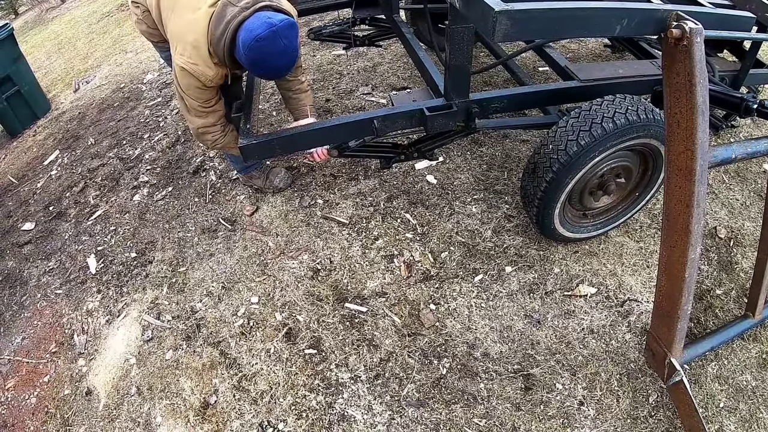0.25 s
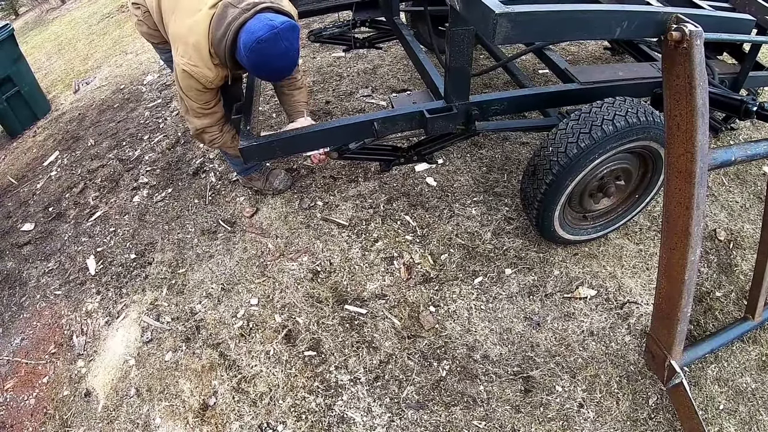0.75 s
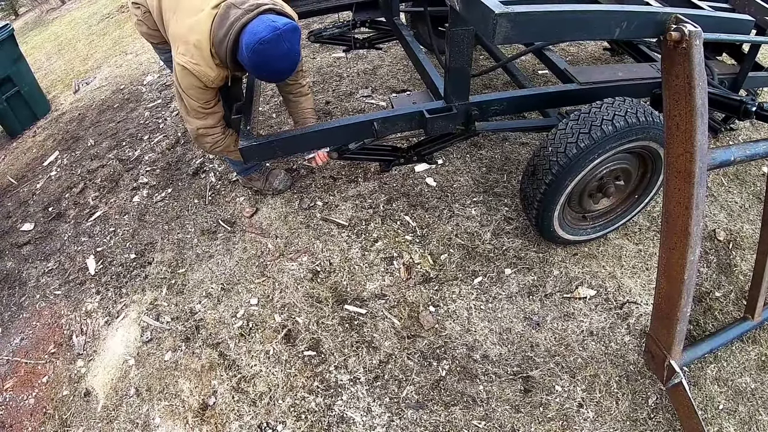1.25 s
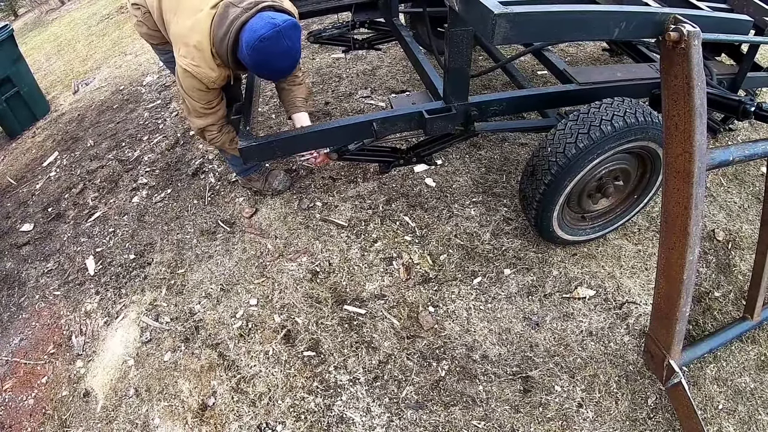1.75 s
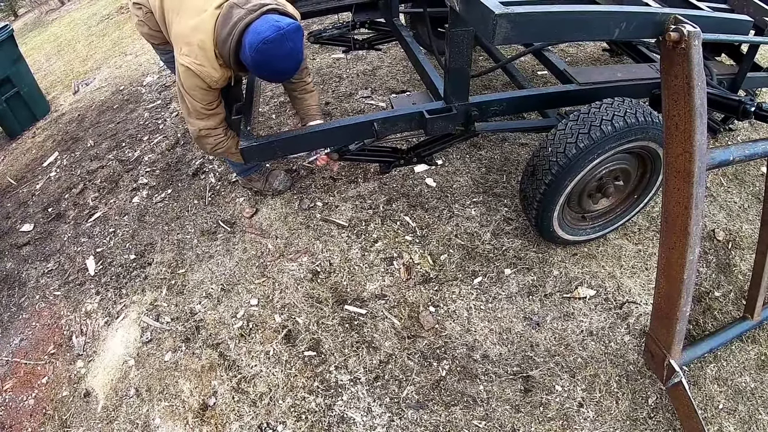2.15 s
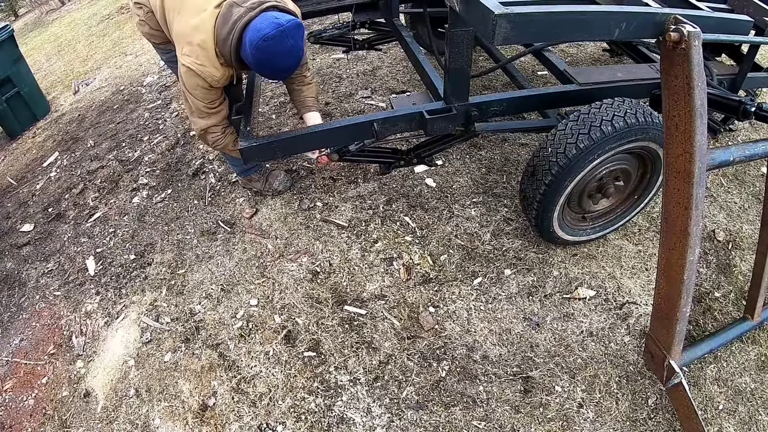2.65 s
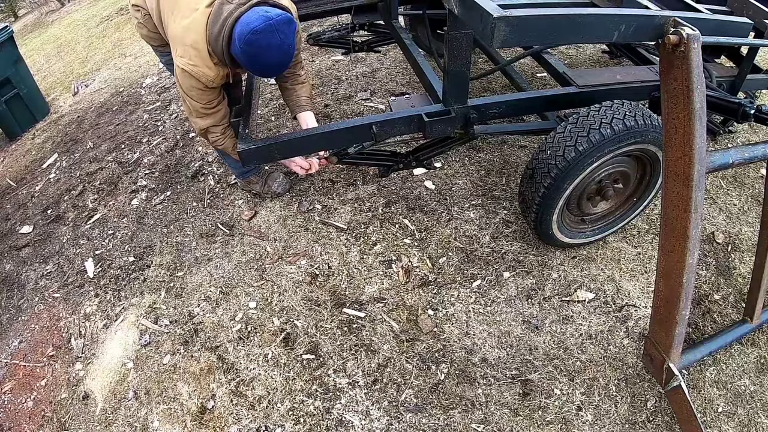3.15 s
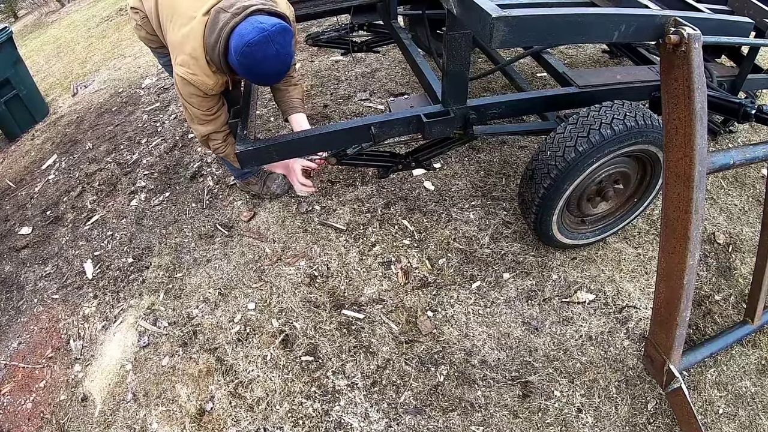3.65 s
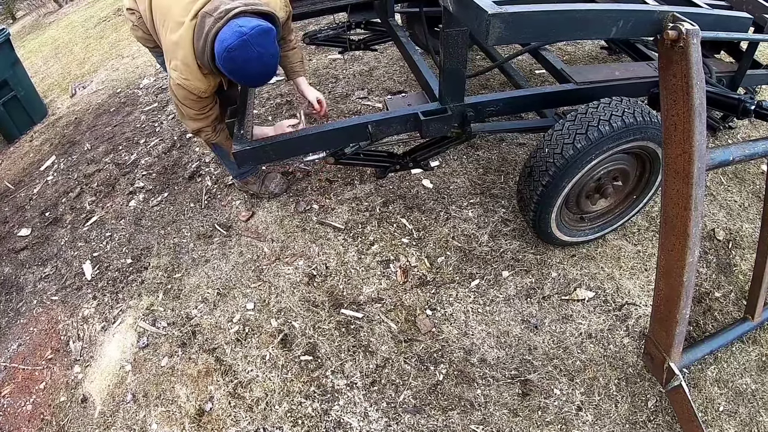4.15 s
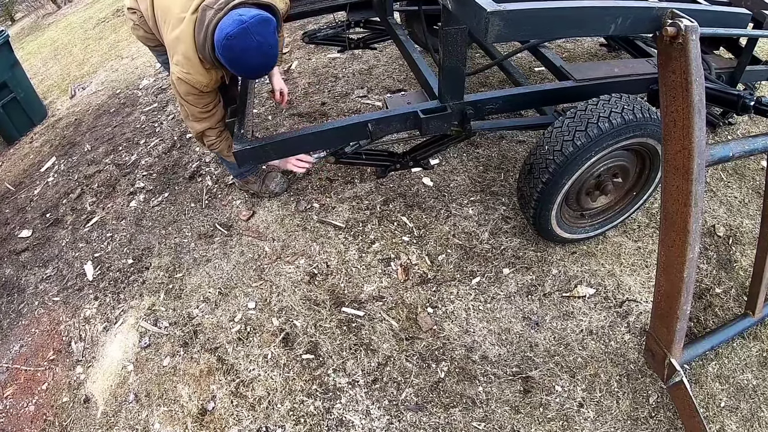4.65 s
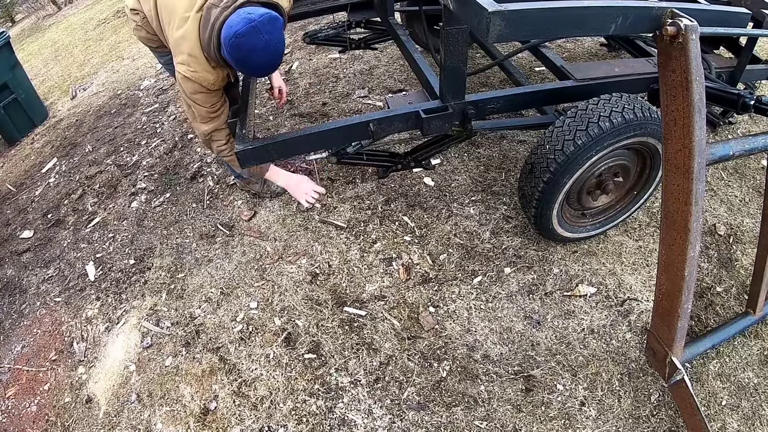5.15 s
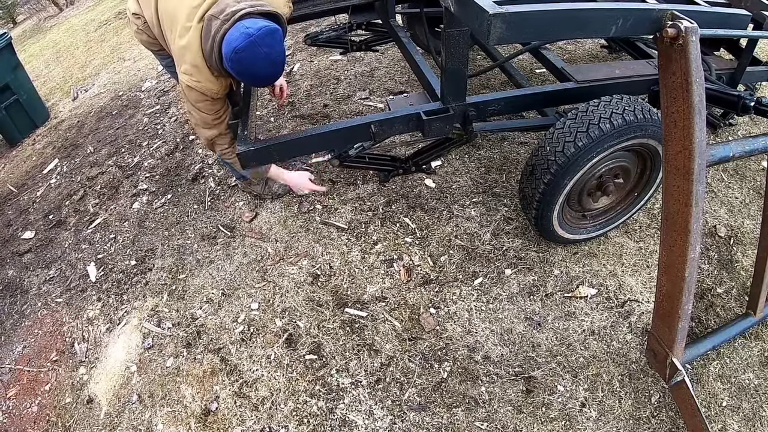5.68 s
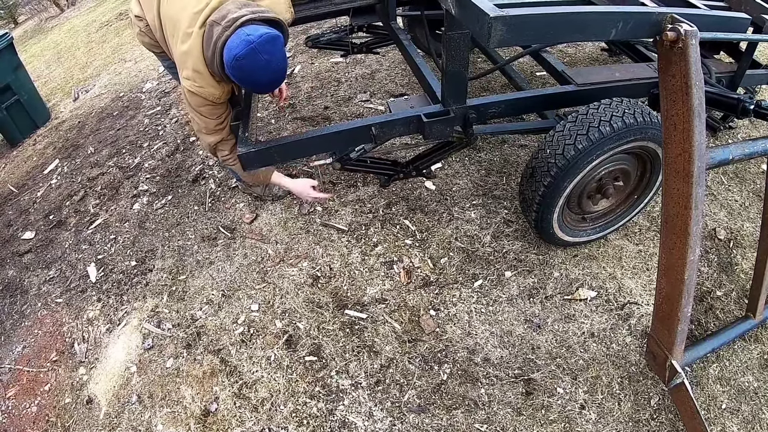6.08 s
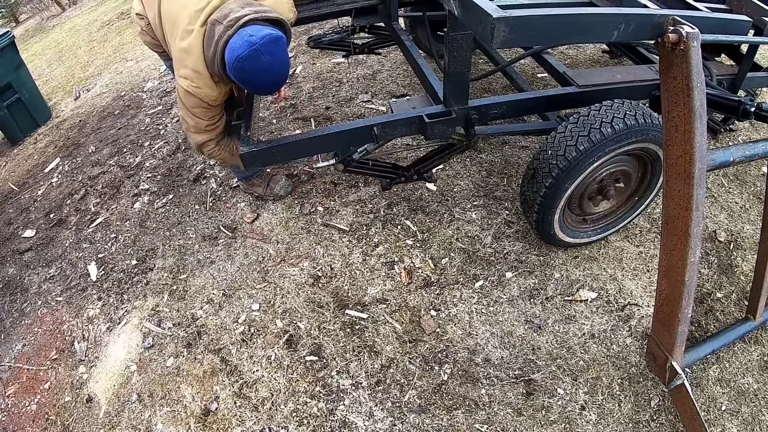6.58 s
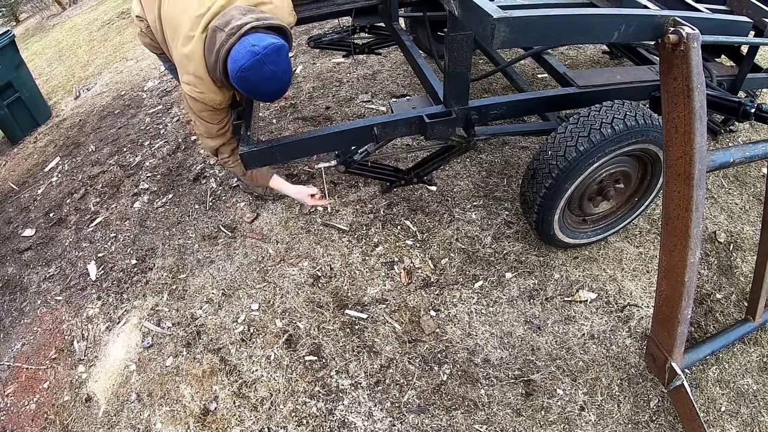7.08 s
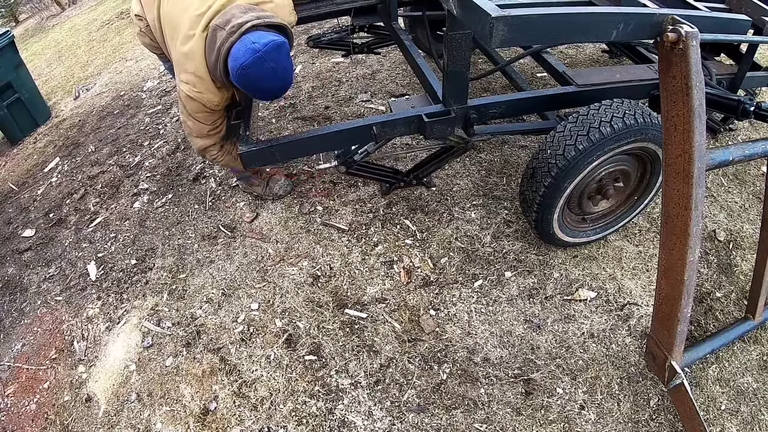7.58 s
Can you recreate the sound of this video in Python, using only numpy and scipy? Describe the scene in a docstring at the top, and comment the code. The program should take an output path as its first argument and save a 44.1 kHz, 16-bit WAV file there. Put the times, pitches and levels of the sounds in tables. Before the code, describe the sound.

Irregular metallic clacks and two bright rings, a quieter pause, then faint ticks building to regular loose steel clunks, with wind rumbling against the microphone.

```python
"""Outdoors in gusty wind, a steel scissor jack under a trailer is wound down by hand before a two-port microphone.
A wrench knocks on the loaded screw: noise cracks and decaying modes make jack, frame and handle ring.
The freed screw spins, a hiss of noise roughened by grit, while its loose joint clicks once a turn.
Low noise swells as wind buffets the ports, over still air and a faint far hum."""
import sys
import numpy as np
from scipy import signal
from scipy.fft import rfft, irfft, next_fast_len
from scipy.io import wavfile
from scipy.ndimage import uniform_filter1d

SR = 44100
rng = np.random.default_rng(int(sys.argv[2]) if len(sys.argv) > 2 else 0)


def file_out(sig):
    """Save sig as 16-bit WAV at sys.argv[1]."""
    # one column per channel
    cols = np.atleast_2d(sig).T
    # limit, then scale
    lim = np.clip(cols, -1, 1)
    pcm = np.round(lim * 32767).astype(np.int16)
    wavfile.write(sys.argv[1], SR, pcm)


N = 344862
TIME = np.arange(N) / SR


# Wrench on the jack: t/s, mid level/dB (before a common trim), hardness = bright against mid/dB,
# free ring/dB (relative), drag/s, pitch favoured by the contact point f/Hz
KNOCKS = [(0.002, -45.5, -7, -20, .004, 1140), (0.037, -39.5, -7.5, -18, 0.0024, 1170),
          (0.102, -42.5, -11, -18.5, 0.0021, 1156), (0.141, -33.5, 2.5, -35, .0037, 2700),
          (0.165, -37, -6.5, -33, .0012, 1240), (0.286, -36, 9, -38.5, .0005, 3006),
          (0.389, -32, 5, -34, 0.00088, 2850), (0.504, -23.5, 4, 4.5, 0.00049, 3060),
          (0.566, -29.5, -2, -5.5, .0006, 1420), (0.806, -34, 6, -13.5, 0.0022, 2710),
          (0.867, -35.5, -4.5, -34, .003, 1830), (1.232, -57, -4, -37, 0.0026, 1530),
          (1.275, -45.5, -1, -24.5, 0.0029, 1540), (1.289, -29, 1.5, -18, .0004, 1546),
          (1.378, -44, -7.5, -27.5, 0.00212, 1510), (1.569, -51, -6.5, -11, 0.0014, 1607),
          (1.642, -25, 6.5, 7.5, 0.00079, 2970), (1.750, -39, 0, -8.5, .006, 3080),
          (1.954, -32, 7, -26.5, 0.00095, 3160), (2.094, -50.5, -3.5, -3, .005, 3320),
          (2.137, -40, -4, -15, .004, 3190), (2.16, -41.5, 2, -22, 0.0011, 2930),
          (2.235, -35, 8, -22, .002, 2380), (2.289, -39, -.5, -33.5, .002, 1620),
          (2.873, -31.5, 3, -7, 0.00037, 2970), (3.0, -55.5, 1, -10, 0.0022, 1400),
          (3.518, -37, -4, -11, .0027, 2890), (3.543, -34, -8, -24, 0.00043, 1544),
          (3.654, -47, -1, -31, 0.00046, 1580), (3.836, -56.5, -4.5, -41, 0.00047, 1220),
          (3.936, -61, -18, -15, .0007, 1150), (4.569, -32.5, -3, -8, 0.0018, 1605)]
# Knock spectrum, shape only: f/Hz, level/dB per Hz
KNOCK_COLOUR = [(250, -9.5), (500, -3), (950, -8.5), (1250, -3), (2500, -5), (3200, 0.5), (3850, -10.5),
                (4700, -17.5), (7000, -19.5), (8500, -30.5), (10500, -25), (12000, -39.5), (15000, -47)]
# Resonances of the loaded jack with the wrench on: f/Hz, width/Hz, level/dB
LOADED_PEAKS = [(394, 50, 3), (655, 18, 8.5), (1400, 42, 3.5), (1598, 100, 9), (1735, 50, 8.5),
                (2256, 33.4, 5.5), (2960, 80, 5.5), (3050, 80, -3), (3480, 200, -3), (3630, 100, 1),
                (8930, 150, 4.5), (9450, 630, 8.5)]
# A typical knock: its level, the level of its low register, and how far the low register follows the knock
KNOCK_DB, KNOCK_LOW_DB, KNOCK_LOW_FOLLOWS = -35, -45.5, 0.75
# Top against bright register: ringing, quick blows reach higher
KNOCK_TOP_DB, TOP_PER_RING, TOP_DB_PER_DRAG_DOUBLING, TYPICAL_DRAG_S = -22, 0.46, -1, 0.0022


def wrench(size=27000):
    """Knocks on the loaded screw, which passes them on to the trailer frame."""
    out, hz = np.zeros((2, N)), bins(size)
    body = colour(KNOCK_COLOUR, hz, LOADED_PEAKS) * fine_modes(size)
    for s, db, hardness_db, ring_db, drag, pitch_hz in KNOCKS:
        struck = body * (0.5 + resonance(hz, pitch_hz, width=26, db=12.0))
        ringing_db = ring_db + 17
        # a blow that rings also shakes the frame harder
        tail_db = np.array([6, -5, -12, -23]) + 0.55 * ringing_db
        drag_doublings = np.log2(max(drag, 1e-4) / TYPICAL_DRAG_S)
        low_db = KNOCK_LOW_DB + KNOCK_LOW_FOLLOWS * (db - KNOCK_DB)
        top_db = KNOCK_TOP_DB + TOP_PER_RING * ringing_db + TOP_DB_PER_DRAG_DOUBLING * drag_doublings
        levels_db = [low_db, db, db + hardness_db, db + hardness_db + top_db]
        knock = blow(levels_db, struck,
                     crack_t60s=[0.12, 0.086, 0.087, 0.12], tail_t60s=[0.48, 0.23, 0.22, 0.15],
                     tail_db=tail_db, ring_db=ring_db - 0.5, drag=drag, side_db=-8.0, size=size)
        add(out, s, knock)
    return from_db(-3.0) * out


# Notes of the loose wrench handle after a typical knock: f/Hz, level/dB, t60/s
HANDLE_MODES = [(665, -52, 0.11), (1139, -47.5, 0.28)]
# Share of a knock's strength that the handle follows, and its gain as the wrench drags longer
HANDLE_FOLLOWS, HANDLE_DB_PER_DRAG_DOUBLING = 0.35, 3.5


def handle(size=16000, scatter_db=2.0):
    """Each knock leaves two low notes dying away in the loose handle, stronger after a long drag."""
    out, t = np.zeros((2, N)), np.arange(size) / SR
    for s, db, _, _, drag, _ in KNOCKS:
        drag = max(drag, 1e-4)
        drag_doublings = np.log2(drag / TYPICAL_DRAG_S)
        strength_db = HANDLE_FOLLOWS * (db - KNOCK_DB) + HANDLE_DB_PER_DRAG_DOUBLING * drag_doublings
        notes = np.zeros(size)
        for hz, level_db, t60 in HANDLE_MODES:
            level = from_db(level_db + scatter_db * rng.standard_normal())
            notes += level * dying(t, t60) * np.sin(2 * np.pi * hz * t)
        add(out, s, from_db(strength_db) * np.minimum(t / drag, 1) * notes[None])
    return out


# Stray clicks of the joint: t/s, mid level/dB (before a common trim), hardness = bright against mid/dB,
# top against bright/dB, pitch favoured by the contact point f/Hz
CLICKS = [(4.954, -56, -5, -11.5, 1360), (5.161, -43.5, 0.5, -8.5, 2960), (5.238, -46.5, 7.5, -14.5, 2780),
          (5.519, -48.5, -11, -25, 1380), (5.798, -50, -4.5, -19, 1480), (5.904, -49.5, 9.5, -18, 2720),
          (5.977, -41.5, -12, -30, 1400), (6.006, -48.5, -8.5, -30, 1260), (6.268, -47, -3.5, -18, 1440),
          (6.37, -51.5, 0, -19, 1480), (6.623, -38.5, -4.5, -39, 1820), (6.779, -46, -2, -12.5, 1470)]
# Full turns of the spinning screw, about three a second: t/s of the drop, level/dB,
# slowness against a normal turn, hardness/dB, pitch f/Hz
TURNS = [(6.72, -28, 0.95, 0, 3015), (7.072, -24.5, 1.06, -1, 1360), (7.406, -22.5, 1.02, -3.5, 1380),
         (7.743, -24, .97, -0.5, 1293)]
# Lighter clicks around each drop, the same every turn: t/s after the drop in a normal turn,
# level/dB against the drop, hardness/dB, top against bright/dB, pitch f/Hz
TURN = [(-0.151, -15, -12.5, -24, 1484), (-0.098, -23.5, -17, -38, 1680), (-0.04, -7, -7.5, -28, 1404),
        (0.126, -33, 9.5, -14, 3150)]
# Faint ticks of the loose parts between the clicks: first and last slot t/s
TICKING_S = (5.0, 6.5)
TICK_DB, TICK_HARDNESS_DB, TICK_TOP_DB, TICK_HZ = -51, -3.5, -18, 1300
DROP_TOP_DB = -20


def joint_contacts(count=8):
    """Stray clicks, one run of clicks on every full turn, and random ticks that follow the friction."""
    contacts = list(CLICKS)
    for drop, drop_db, slowness, hardness_db, pitch_hz in TURNS:
        contacts.append((drop, drop_db, hardness_db, DROP_TOP_DB, pitch_hz))
        for after, db, *timbre in TURN:
            contacts.append((drop + slowness * after, drop_db + db, *timbre))
    chances = rng.uniform(-1.2, 1, (count, 3))
    strongest_db = max(db for _, db in FRICTION)
    for slot, (when, strength, pitch) in zip(np.linspace(*TICKING_S, count), chances):
        s = slot + 0.12 * when
        friction_db = np.interp(s, *np.transpose(FRICTION)) - strongest_db
        tick_db = TICK_DB + 3 * strength + 0.5 * friction_db
        contacts.append((s, tick_db, TICK_HARDNESS_DB, TICK_TOP_DB, TICK_HZ * (1 + 0.2 * pitch)))
    return contacts


# Click spectrum, shape only: f/Hz, level/dB per Hz
CLICK_COLOUR = [(250, -8.5), (950, -10), (1270, -2.5), (2000, -5.5), (3000, -7), (3900, -4), (4800, -13.5),
                (7000, -19.5), (10000, -33.5), (12000, -41), (15000, -55)]
# Resonances of the slack jack: f/Hz, width/Hz, level/dB
SLACK_PEAKS = [(1446, 130, 6), (1610, 110, 4), (1937, 68, 10.5), (2430, 100, 7), (3057, 85, 3.5),
               (2824, 61, 22.5), (4100, 150, -11), (4170, 55, 0), (7900, 140, -1.5), (9100, 370, 16)]
# A typical click: its level, the level of its low register, and how far the low register follows the click
CLICK_DB, CLICK_LOW_DB, CLICK_LOW_FOLLOWS = -34, -47.5, 0.49


def joint(size=12000, echo_s=0.016, echo_db=-15):
    """The slack joint drops over and stops dead: short clicks, each thrown back once from nearby."""
    out, hz = np.zeros((2, N)), bins(size)
    body = colour(CLICK_COLOUR, hz, SLACK_PEAKS) * fine_modes(size)
    for s, db, hardness_db, top_db, pitch_hz in joint_contacts():
        struck = body * (0.5 + resonance(hz, pitch_hz, width=74, db=11.5))
        low_db = CLICK_LOW_DB + CLICK_LOW_FOLLOWS * (db - CLICK_DB)
        levels_db = [low_db, db, db + hardness_db, db + hardness_db + top_db]
        # light touches slide in, hard ones snap
        drag = np.interp(max(levels_db), [-38, -26], [0.002, 0.0009])
        click = blow(levels_db, struck,
                     crack_t60s=[0.034, 0.044, 0.026, 0.052], tail_t60s=[0.31, 0.24, 0.13, 0.33],
                     tail_db=[2.5, -20.0, -8, -15.0], ring_db=-27.5, drag=drag, side_db=-8.0, size=size)
        add(out, s, click)
        add(out, s + echo_s, from_db(echo_db) * click)
    return from_db(-3.0) * out


# Friction of the turning screw: t/s, level/dB (before a trim and the grit)
FRICTION = [(0.0, -61), (0.76, -57), (0.96, -81.5), (1.59, -63.5), (1.76, -56.5), (2.2, -70), (2.4, -68.5),
            (2.98, -76.5), (3.99, -59.5), (4.4, -73), (4.9, -71), (5.23, -58), (5.71, -60.5), (7.82, -54.5)]
# Dry stretches where the thread rubs harder: t/s of the peak, level/dB (before the grit),
# time from the peak to 1/e of it/s
RUBS = [(0.136, -57, 0.0091), (2.141, -62, .042), (2.463, -62, 0.011), (2.679, -67, 0.026),
        (3.321, -65.5, 0.091), (3.997, -61.5, 0.072), (5.079, -65, 0.019), (5.308, -57.5, 0.055)]
# Spectrum of the rubbing thread, shape only: f/Hz, level/dB per Hz
THREAD = [(350, -29), (600, -12.5), (950, -5.5), (1250, 0.5), (2000, -5.5), (3000, 0), (3700, -10),
          (5200, -18), (8700, -25.5), (10700, -28.5), (13000, -51.5), (15000, -63)]
# Resonances of the rubbing screw: f/Hz, width/Hz, level/dB
THREAD_PEAKS = [(1400, 180, -2.5), (2580, 100, -3), (3000, 150, 4)]


def thread(grains_per_s=70, grain_db=5.0, grain_t60=0.089):
    """The screw hisses as it rubs in its nut; grit in the thread catches at random."""
    friction_db, = in_time(FRICTION)
    rubbing = from_db(friction_db - 4.0) + sum(swell(*rub) for rub in RUBS)
    catches = (rng.random(N) < grains_per_s / SR) * rng.uniform(0, 2.3, N) ** 2
    # grit adds power, so it decays at twice the rate of an amplitude
    grit = signal.lfilter([1], [1, -dying(2 / SR, grain_t60)], catches + 1e-18)
    size = next_fast_len(N, real=True)
    steel = colour(THREAD, bins(size), THREAD_PEAKS) * fine_modes(size) ** 0.6
    grit = uniform_filter1d(np.maximum(grit, 0), size=40)  # a catch builds over a millisecond
    hiss = noise(steel, side_db=-7.0, size=size)[:, :N]
    return rubbing * np.sqrt(1 + from_db(grain_db) * grit) * hiss


# Edges of the low, mid, bright and top register: f/Hz
REGISTER_EDGES_HZ = [250, 1000, 2500, 5000, 15500]
# Free ring in each of the four registers, relative: level/dB
REGISTER_RING_DB = [8, 3.5, -3.5, 0]


def blow(levels_db, body, crack_t60s, tail_t60s, tail_db, ring_db, drag, side_db, size):
    """One steel contact: in each register a chattering crack, a tail from the frame and a free ring."""
    t, hz, out = np.arange(size) / SR, bins(size), 0
    seat = np.minimum(t / max(drag, 1e-4) / 2, 1) ** 2
    after = np.maximum(t - 2 * drag - 0.002, 0)  # the parts stay in contact for a moment
    skips = chatter(t, depth_db=2.1)
    for k, (low, high) in enumerate(zip(REGISTER_EDGES_HZ, REGISTER_EDGES_HZ[1:])):
        gain = body * (hz >= low) * (hz < high)
        crack = noise(gain, side_db, size) * dying(after, crack_t60s[k]) * skips
        tail = noise(gain, side_db, size) * dying(after, tail_t60s[k]) * from_db(tail_db[k])
        ring = from_db(ring_db + REGISTER_RING_DB[k]) * free_ring(t, low, high)
        sound = seat * (crack + tail + ring)
        strength = np.sqrt(np.mean(sound[:, :SR // 50] ** 2))  # over the first 20 ms
        out = out + from_db(levels_db[k]) * sound / strength
    return out


def chatter(t, depth_db, per_s=300):
    """Steel skips on steel: the force wanders randomly every few milliseconds."""
    return from_db(depth_db * np.interp(t * per_s, np.arange(600), rng.standard_normal(600)))


# Ring of jack and frame: f/Hz, level/dB (relative), t60/s
FRAME_MODES = [(385, -9, 0.8), (655, 4, 0.4), (732, 0, .9), (1285, -10.5, .3), (1396, 5, 0.41),
               (1580, -4, .28), (1747, 3.5, 0.42), (1830, -4, 0.31), (2006, -4, .3), (1900, -4, 0.39),
               (2160, -4, 0.29), (2344, -10, 0.25), (2800, -5, 0.22), (3155, 0, 0.42), (3282, -1, 0.35),
               (3390, -3, .3), (3461, 2, 0.25), (3495, -2, 0.4), (3548, 4, .2), (3690, 1, 0.16),
               (3790, -1, 0.15), (6230, -4.5, .12), (7560, -7.5, .12), (8272, 5, 0.11), (8390, -3, 0.096),
               (8904, -2, 0.07), (10050, -7.5, 0.1), (10170, -8.5, 0.1)]


def free_ring(t, low, high, scatter_db=1.5, port_phase=0.1):
    """One register's modes; twin arms split each into a beating pair, and each blow weights them anew."""
    modes = [m for m in FRAME_MODES if low <= m[0] < high]
    hz, level_db, t60 = np.repeat(modes, 2, axis=0).T
    chance = rng.standard_normal((4, len(hz)))
    twin = np.arange(len(hz)) % 2
    hz = hz * (1 + 0.006 * twin * chance[3])
    weight = rms_one(from_db(level_db - 3.1 * twin + scatter_db * chance[0])) / np.sqrt(len(hz) / 2)
    phase = (2 * np.pi * (hz[:, None] * t + chance[1][:, None])).astype(np.float32)
    fade = np.exp((-np.log(1000) * t / t60[:, None]).astype(np.float32))
    # each mode reaches the two ports slightly out of phase
    mid = (weight * np.cos(port_phase * chance[2])) @ (fade * np.sin(phase))
    side = (weight * np.sin(port_phase * chance[2])) @ (fade * np.cos(phase))
    return mid + side * [[1], [-1]]


# Jack at the left port against the right: f/Hz, level/dB
LEFT_LEAN = [(380, 0.5), (700, -3.5), (1400, -4.5), (2800, -3), (5000, 0), (8500, -3), (13000, 8.5)]
# Phase lag of the left port behind the right: f/Hz, lag/rad
LEFT_LAG = [(0, 0.5), (1400, 0.3), (3100, 0.37), (4000, 1.3), (5300, 3.88), (8400, 1.5), (10500, 4.7),
            (13000, 1.8)]


def at_ports(x):
    """The jack's sound lags at the left port of the microphone and is mostly louder at the right."""
    size = next_fast_len(N + 256, real=True)
    hz = bins(size)
    lean = np.sqrt(colour(LEFT_LEAN, hz))
    lag = np.interp(hz, *np.transpose(LEFT_LAG))
    return irfft(rfft(x, size) * [lean * np.exp(-1j * lag), 1 / lean], size)[:, :N]


# Breeze between gusts: t/s, level/dB (before a gain and the port balance)
BREEZE = [(0.0, -45), (0.17, -44.5), (1.35, -78.5), (2.02, -78), (2.18, -52), (2.63, -37), (2.79, -41.5),
          (2.96, -56.5), (3.81, -55.5), (4.12, -57), (4.53, -73), (5.49, -57.5), (5.57, -51.5),
          (6.66, -35.5), (7.01, -42), (7.82, -41)]
# Gusts: t/s of the peak, level/dB (before the port balance), time from the peak to 1/e of it/s,
# quick eddies against slow/dB
GUSTS = [(0.048, -29, 0.018, -18.5), (0.36, -44, 0.058, -33), (0.924, -55.5, 0.079, -14),
         (2.085, -45.5, 0.073, -24.5), (2.391, -39.5, .025, -20), (2.531, -38.5, 0.068, -4),
         (2.827, -27.5, 0.024, 0), (2.89, -24.5, 0.038, -13), (3.202, -30, 0.021, -19),
         (3.268, -29, 0.055, -24), (3.895, -42.5, 0.022, -38.5), (4.106, -43, 0.07, -42),
         (4.259, -38, 0.035, -22.5), (4.94, -39.5, 0.043, -33.5), (5.26, -49, 0.034, -26.5),
         (5.493, -39, .04, -28.5), (5.769, -31, 0.023, -39), (6.03, -44, 0.03, -13),
         (6.27, -45, 0.075, -20), (6.637, -34.5, 0.077, -13), (7.095, -41, .04, -24), (7.3, -35, 0.06, -25),
         (7.494, -47.5, 0.019, 0), (7.754, -27.5, 0.041, -7.5)]
# Spectrum of the slow eddies, shape only: f/Hz, level/dB per Hz
RUMBLE = [(15, -5), (30, -1), (55, 1), (105, -5), (150, -13.5), (250, -28), (500, -100)]
# Spectrum of the quick eddies, shape only: f/Hz, level/dB per Hz
FLUTTER = [(50, -14.5), (110, -17), (170, 3), (260, -6.5), (400, -20), (700, -36), (1500, -74)]
# Quick eddies grow with the breeze; buffets grow as a power of the quick eddies, from a reference level
BREEZE_GAIN_DB, FLUTTER_DB, FLUTTER_FOLLOWS = 3, -33, 0.58
BUFFET_REFERENCE_DB, BUFFET_DB, BUFFET_GROWTH = -26, -14.5, 1.9


def wind():
    """Eddies press on each port of the microphone; the hardest buffets reach higher in pitch."""
    breeze_db, = in_time(BREEZE)
    slow = from_db(breeze_db + BREEZE_GAIN_DB)
    quick = from_db(FLUTTER_DB + FLUTTER_FOLLOWS * breeze_db)
    for s, db, length, quick_db in GUSTS:
        gust = swell(s, db, length)
        slow = slow + gust
        quick = quick + from_db(quick_db) * gust
    rumble = slow * steady(RUMBLE, side_db=-3)
    flutter = from_db(2.0) * quick * steady(FLUTTER, side_db=-3.5)
    force = from_db(BUFFET_DB) * (quick / from_db(BUFFET_REFERENCE_DB)) ** BUFFET_GROWTH
    buffet_colour = [(30, -13), (110, 12.0), (250, -9), (430, -9.0), (700, -24.5), (1500, -45), (4000, -78)]
    buffets = force * steady(buffet_colour, side_db=2)
    # the right port takes more of the wind
    return (rumble + flutter) * from_db([[-3], [3]]) + buffets * from_db([[-4], [3.5]])


# Spectrum of the still air, shape only: f/Hz, level/dB per Hz
AIR = [(15, -21.5), (30, -11), (90, -31), (160, -6), (230, -7.5), (344, -26), (558, -28), (800, -22),
       (1310, -25.5), (2180, -37.5), (3010, -38), (4620, -49), (9520, -49), (12500, -66.5), (15000, -66.5)]
AIR_DB, HUM_DB, HUM_HZ = -61.5, -60, 155.3


def yard(hum_width_hz=16):
    """Still air as coloured noise, and a distant hum as a narrow band of noise."""
    size = next_fast_len(N, real=True)
    hum_gain = 1 / (1 + (2 * (bins(size) - HUM_HZ) / hum_width_hz) ** 2)
    hum = noise(hum_gain, side_db=-18, size=size)[:, :N]
    return from_db(HUM_DB) * hum + from_db(AIR_DB) * steady(AIR, side_db=-3)


def fine_modes(size, spacing_hz=26, depth_db=2.4):
    """Countless crowded steel modes ripple a part's spectrum, the same on every blow."""
    hz = np.arange(1000) * spacing_hz
    return from_db(depth_db * np.interp(bins(size), hz, rng.standard_normal(len(hz))))


def resonance(hz, centre, width, db):
    """Gain that one resonance adds at each frequency."""
    return (from_db(db) - 1) / (1 + (2 * (hz - centre) / width) ** 2)


def colour(points, hz, peaks=()):
    """Gain of a smooth spectrum with resonances standing on it."""
    at, level_db = np.transpose(points)
    smooth = from_db(np.interp(np.log(hz), np.log(at), level_db))
    return smooth * (1 + sum(resonance(hz, *peak) for peak in peaks))


def noise(gain, side_db, size):
    """Stereo noise with the given gain per bin and width; rms 1."""
    mid, side = irfft(rfft(rng.standard_normal((2, size))) * gain, size)
    return rms_one(mid + from_db(side_db) * side * [[1], [-1]])


def steady(points, side_db):
    """Coloured noise for the whole scene."""
    size = next_fast_len(N, real=True)
    return noise(colour(points, bins(size)), side_db, size)[:, :N]


def swell(s, db, length):
    """A smooth rise and fall around one moment."""
    return from_db(db) * np.exp(-np.minimum(((TIME - s) / length) ** 2, 50))


def dying(t, t60):
    """Exponential decay, 60 dB down after t60 seconds."""
    return from_db(-60 * t / t60)


def in_time(rows):
    """Draws each column of a timed table as a line through the scene."""
    s, *columns = np.transpose(rows)
    return [np.interp(TIME, s, c) for c in columns]


def add(out, s, sound):
    """Lays a sound into the scene from the given second."""
    start = max(int(s * SR), 0)
    out[:, start:start + sound.shape[1]] += sound[:, :max(N - start, 0)]


def bins(size):
    """Frequencies of the spectrum in Hz, kept off zero for the logarithm."""
    return np.maximum(np.fft.rfftfreq(size, 1 / SR), 1)


def from_db(db):
    """Amplitude from decibels."""
    return 10 ** (np.asarray(db) / 20)


def rms_one(x):
    """Scales to an rms of 1."""
    return x / np.sqrt(np.mean(x ** 2) + 1e-20)


def scene():
    """The jack as it reaches the ports, the wind on them and the yard behind."""
    jack = wrench() + joint() + thread() + handle()
    return at_ports(jack) + wind() + yard()


def record(dry):
    """The microphone lifts the treble; a steep low-pass cuts the top at 15.3 kHz."""
    treble = signal.sosfilt(signal.butter(1, 6000, "high", fs=SR, output="sos"), dry)
    top_cut = signal.ellip(10, 0.1, 80, 15300, fs=SR, output="sos")
    return signal.sosfilt(top_cut, dry + from_db(-1.5) * treble)


dry = scene()
out = record(dry)
file_out(out)
```